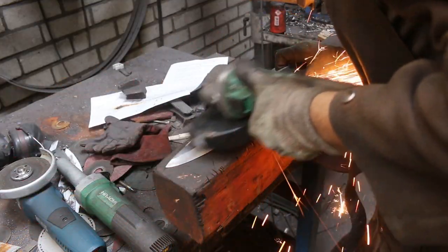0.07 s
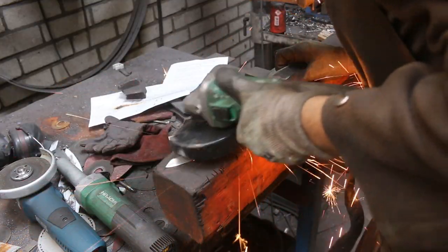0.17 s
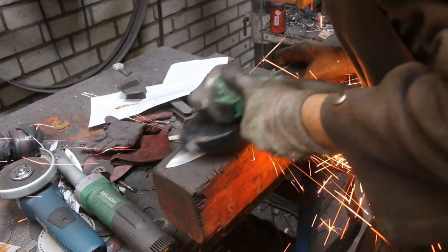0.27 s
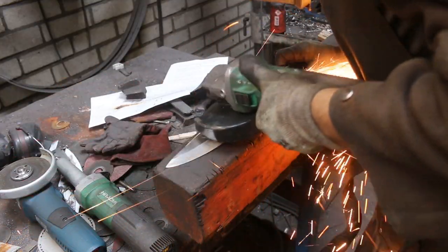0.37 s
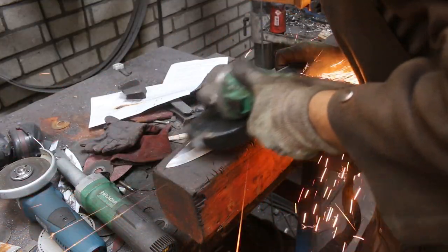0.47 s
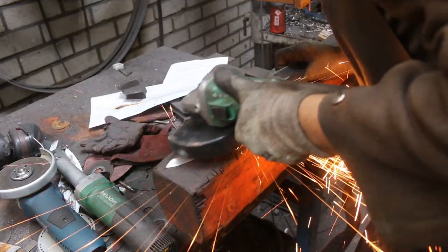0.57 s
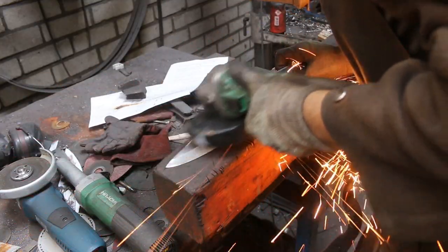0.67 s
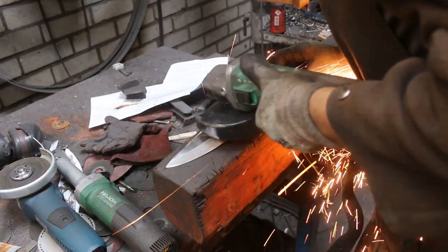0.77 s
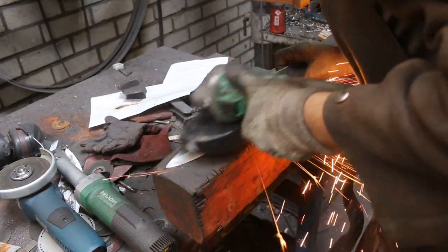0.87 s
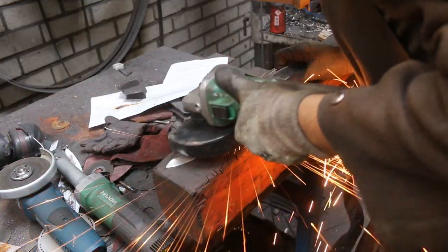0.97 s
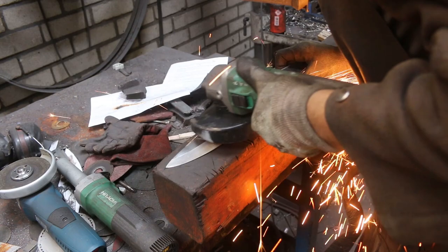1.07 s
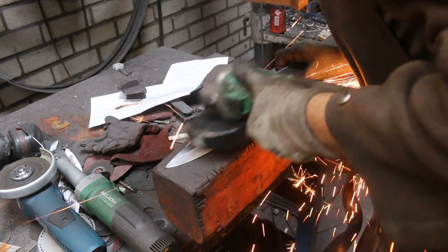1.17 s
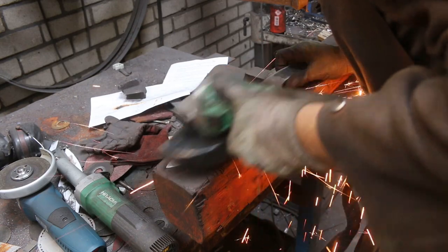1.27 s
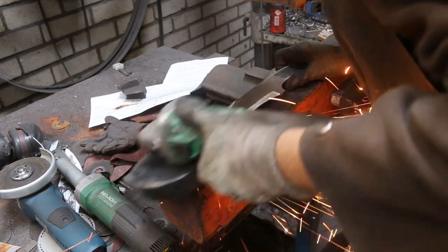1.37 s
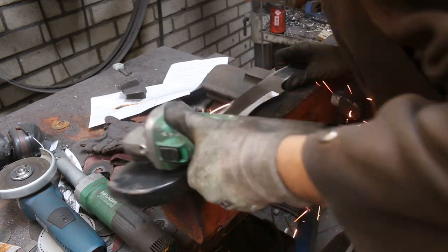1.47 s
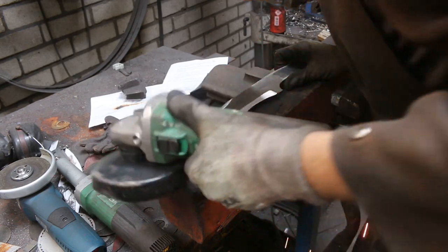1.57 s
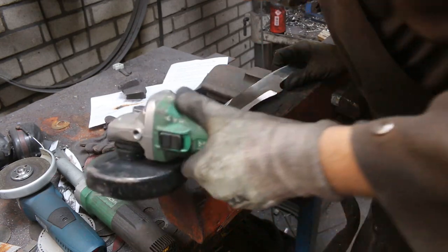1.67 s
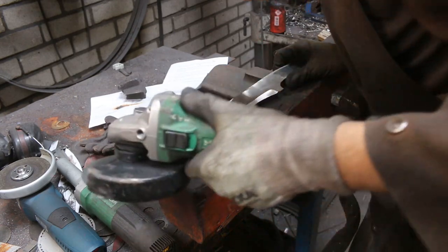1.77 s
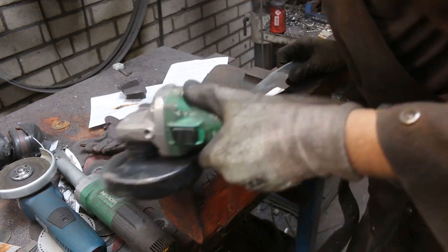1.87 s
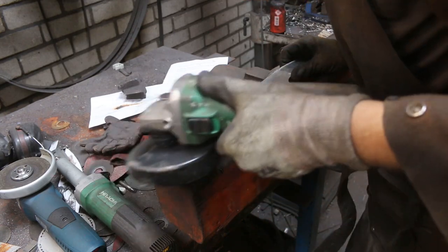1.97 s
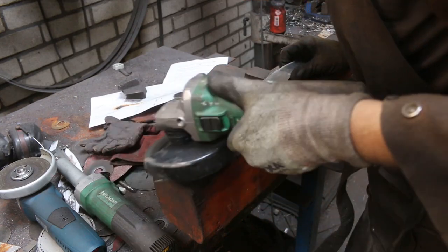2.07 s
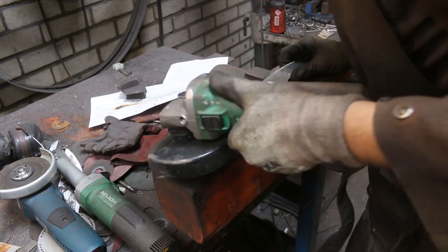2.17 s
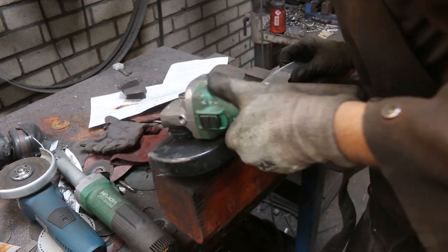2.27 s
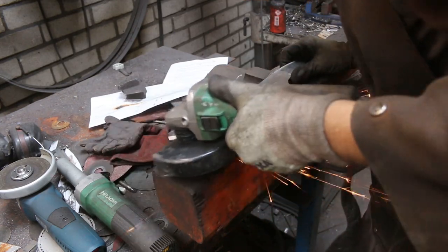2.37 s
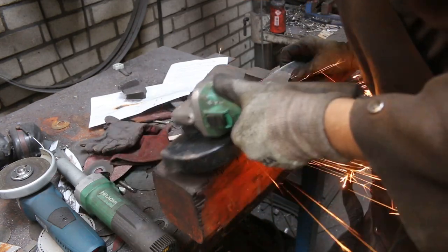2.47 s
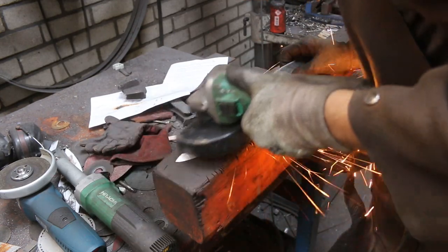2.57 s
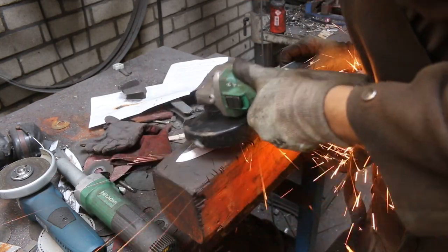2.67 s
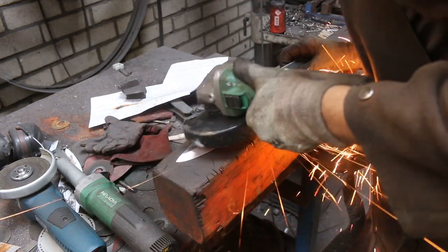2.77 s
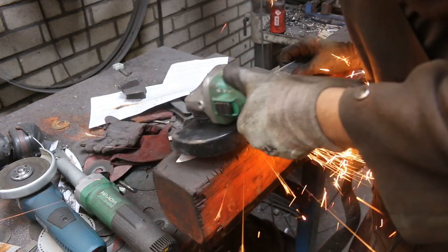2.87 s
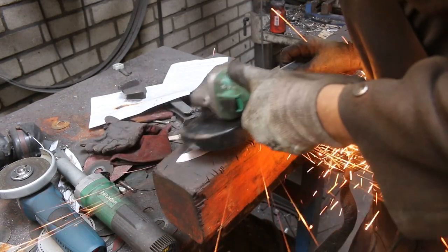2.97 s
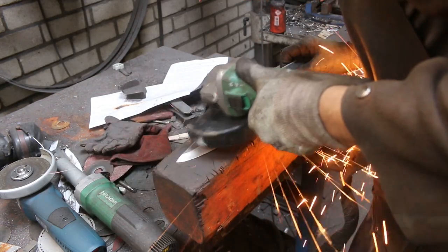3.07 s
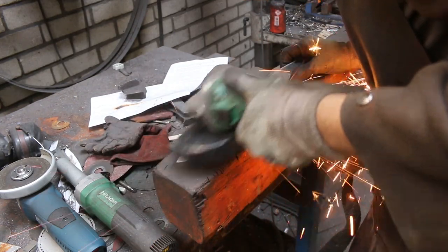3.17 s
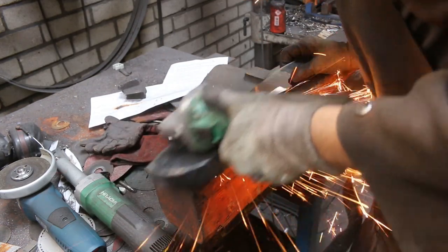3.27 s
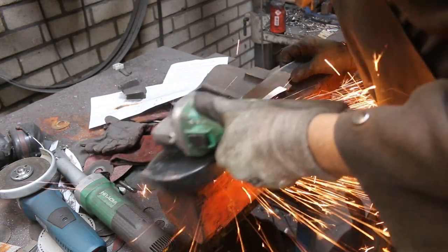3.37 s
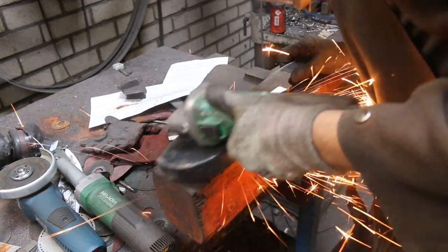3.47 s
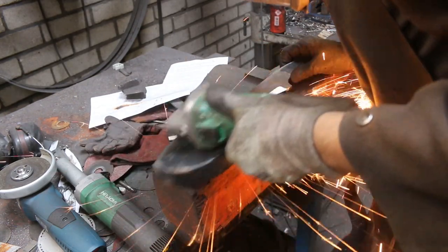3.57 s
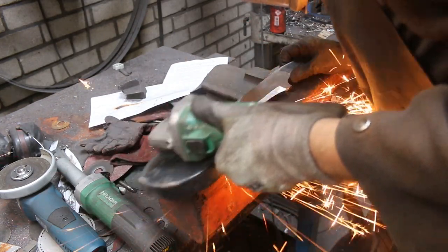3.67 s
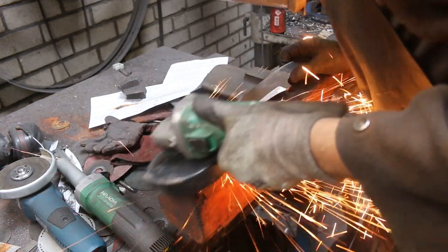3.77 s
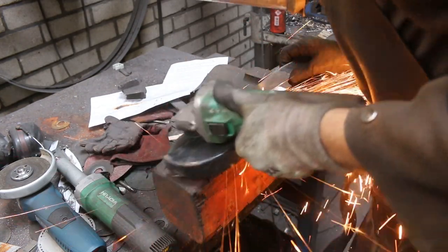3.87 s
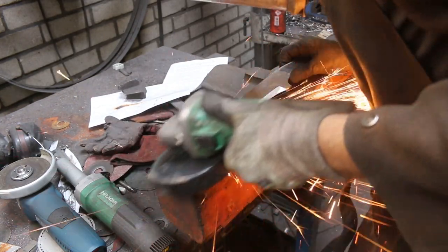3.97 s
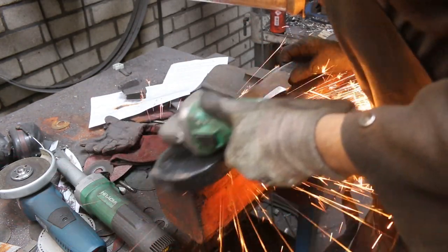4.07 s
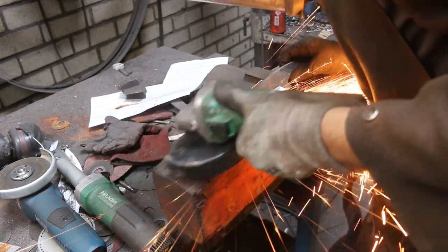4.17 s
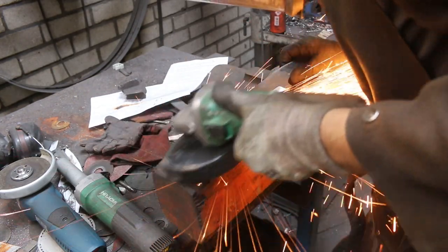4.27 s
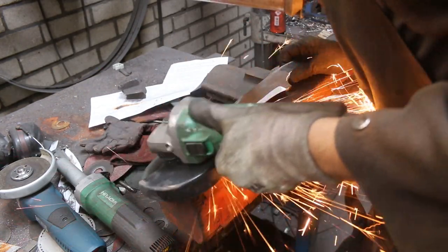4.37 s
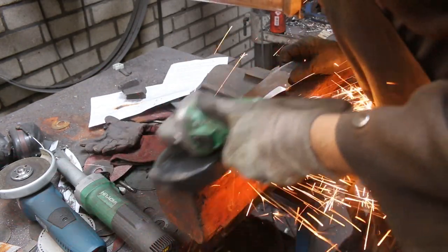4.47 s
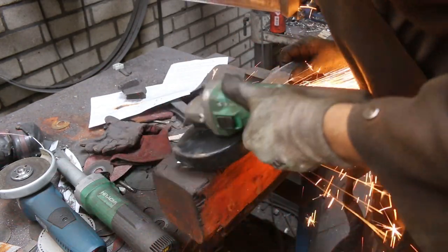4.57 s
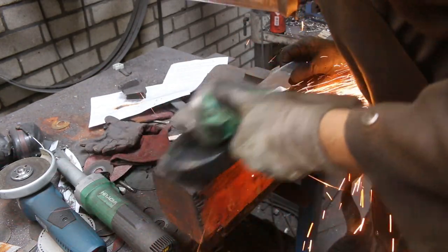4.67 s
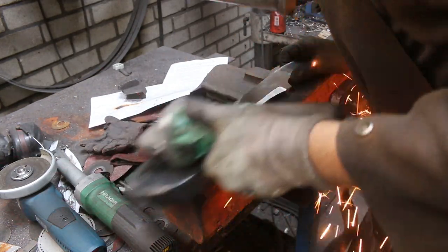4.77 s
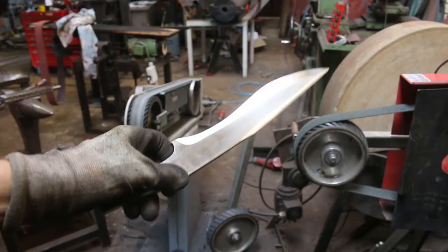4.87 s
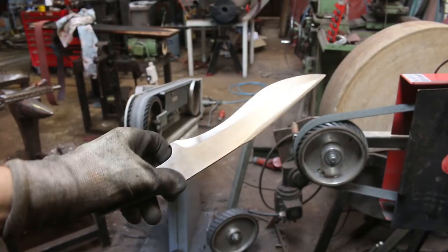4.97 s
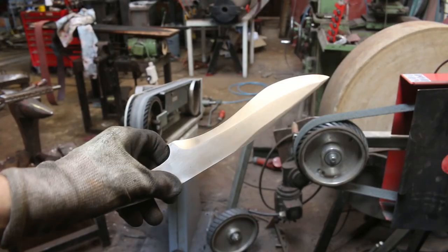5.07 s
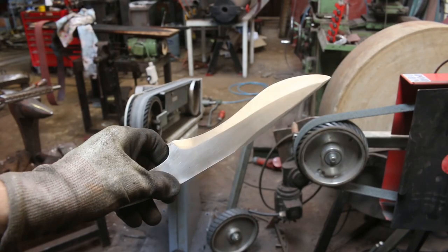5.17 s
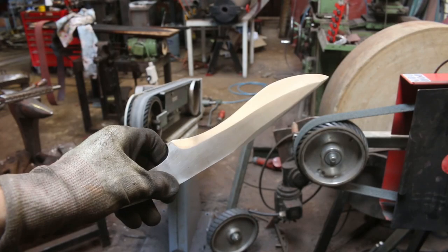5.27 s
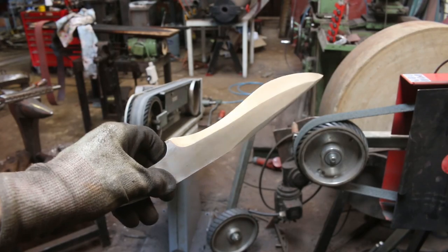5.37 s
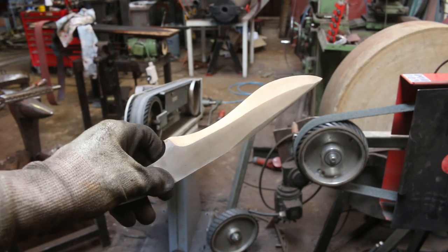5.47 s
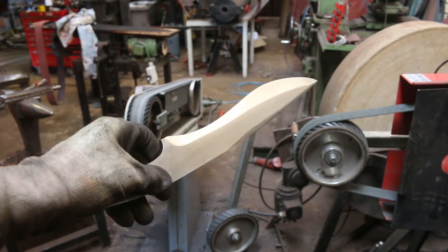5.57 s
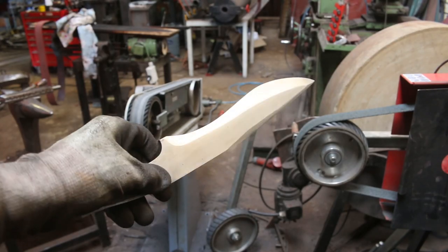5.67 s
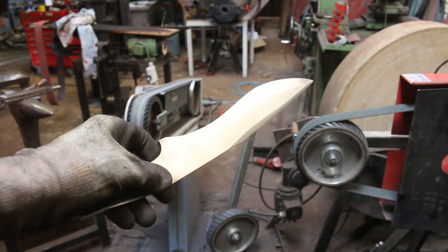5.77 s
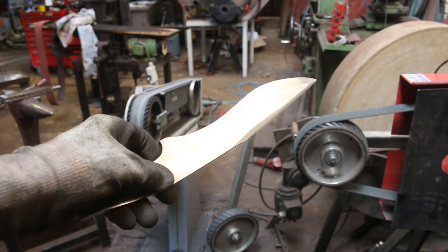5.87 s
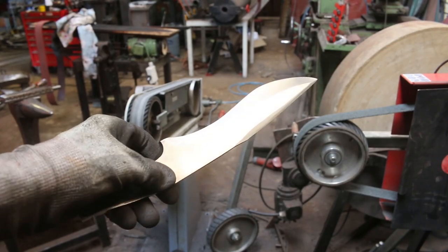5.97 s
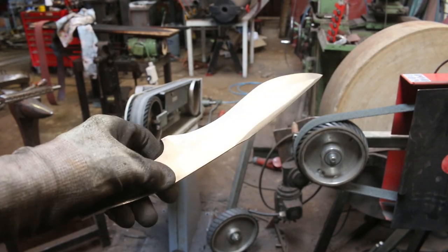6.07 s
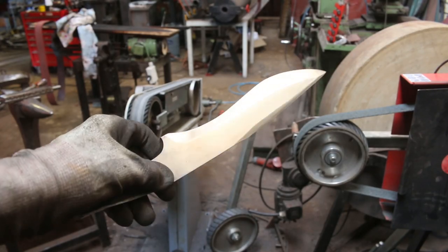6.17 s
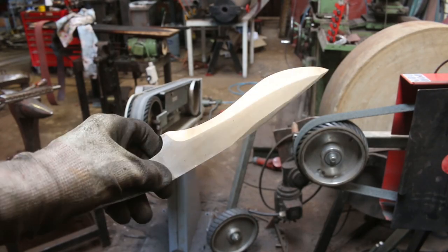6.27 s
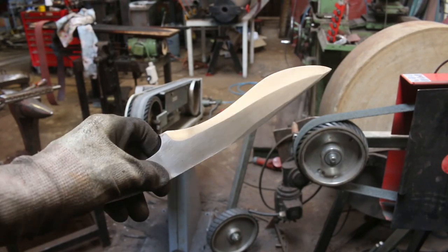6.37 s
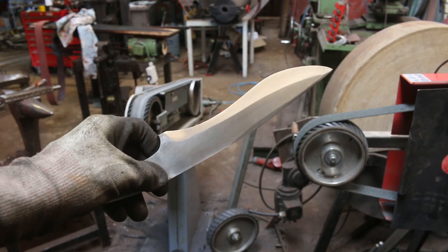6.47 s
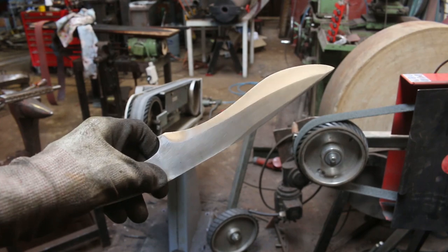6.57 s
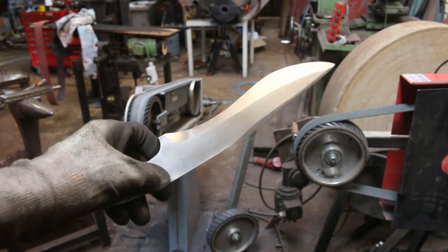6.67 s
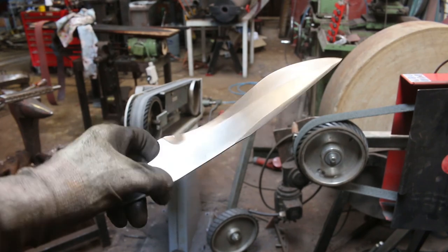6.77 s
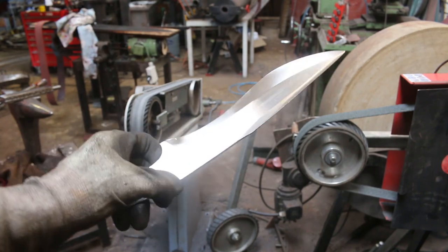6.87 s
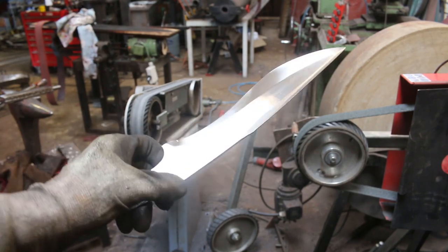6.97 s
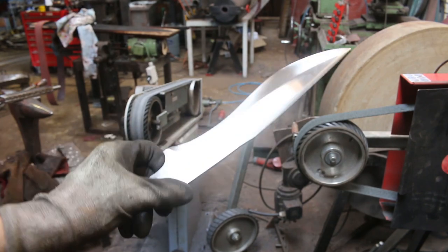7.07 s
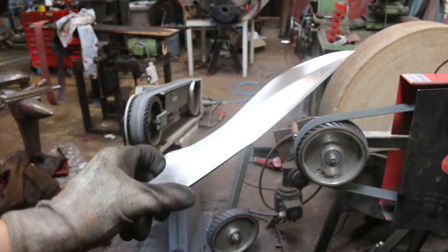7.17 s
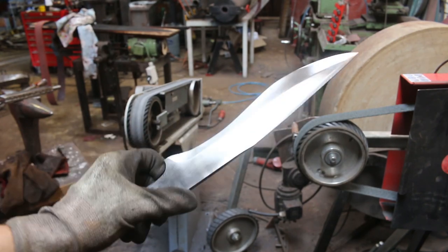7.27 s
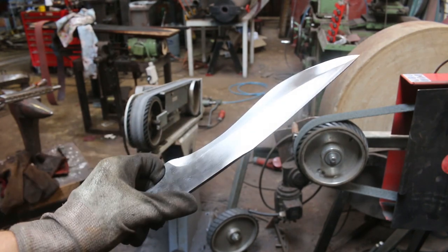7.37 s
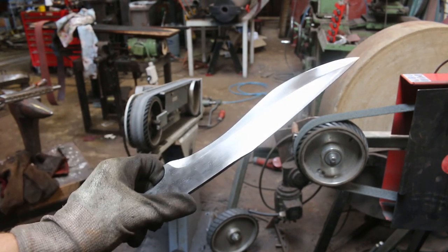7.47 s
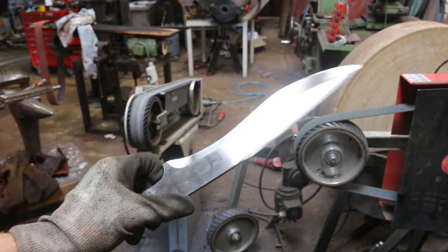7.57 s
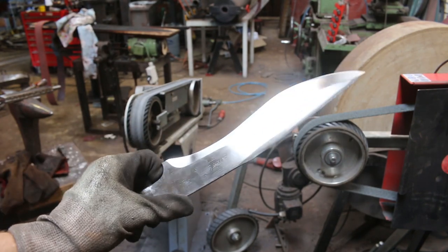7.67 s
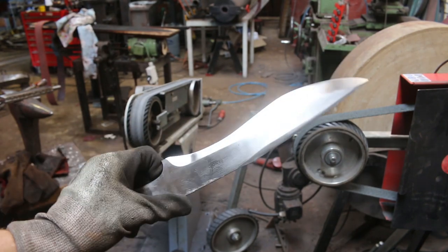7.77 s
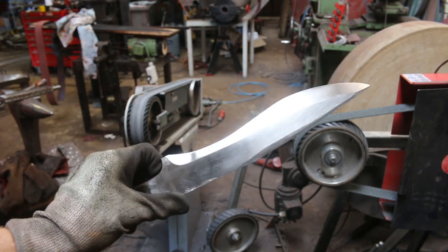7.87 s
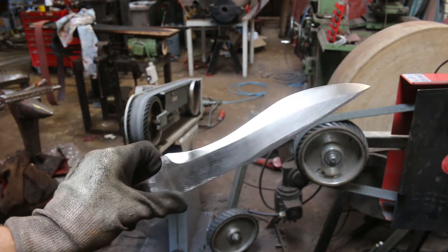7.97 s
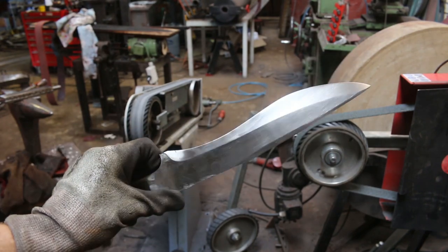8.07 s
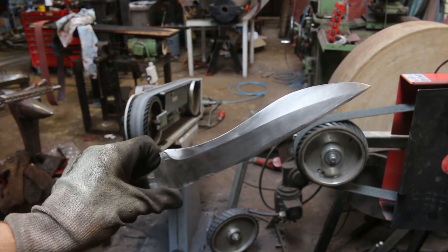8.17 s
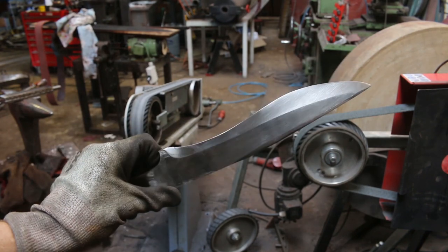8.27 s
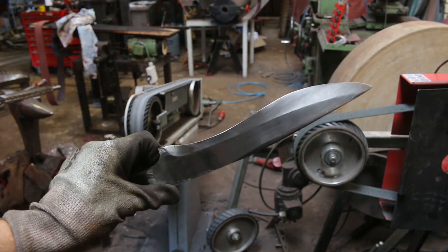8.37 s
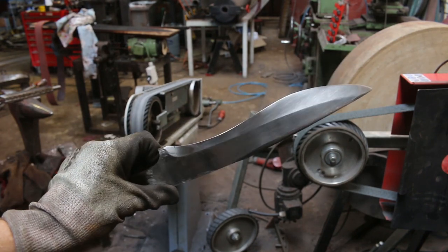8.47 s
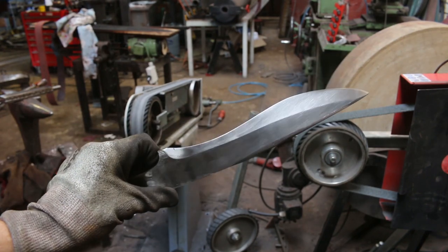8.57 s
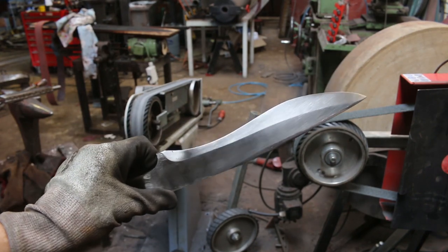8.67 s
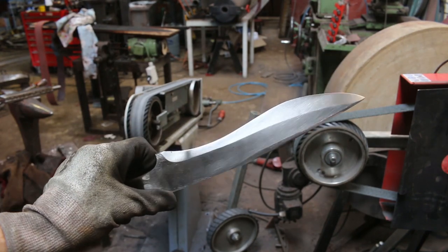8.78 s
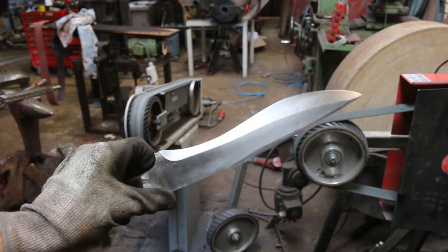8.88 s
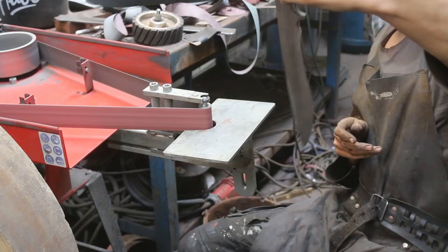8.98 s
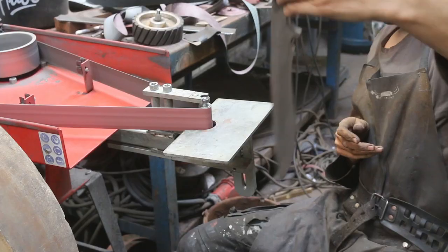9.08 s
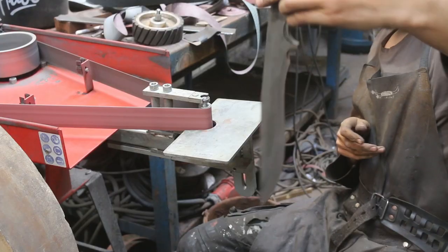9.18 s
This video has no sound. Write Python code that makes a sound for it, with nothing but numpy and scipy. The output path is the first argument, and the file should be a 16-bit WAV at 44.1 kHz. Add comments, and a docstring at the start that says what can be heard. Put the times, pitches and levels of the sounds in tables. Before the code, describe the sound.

A metal workshop, heard close and in stereo. From 0 to about 1.5 s an angle grinder bites into a steel blade: bright gritty hiss and a ringing, chattering scrape, swelling and easing as the hand works to and fro. At 1.5 s it lifts off; the steel ring dies quickly and the disc speeds up, with rattling gears, rising whine and rushing fan air. Around 2.45 s it lands again and labours, its speed sagging until about 4.1 s, with thin high squeals near 3 s and pulsing pushes until 4.75 s. It lifts briefly, clattering. At 4.93 s an abrupt cut: a louder belt grinder runs steadily, with deep room-filling rumble, finely pulsing mid-range belt hiss and a constant whine near 800 Hz. From about 9 s another cut makes the belt harsher and brighter, with rough rasp and several metallic frame tones, to the end.

```python
"""A metal workshop. First an angle grinder bites into a steel blade: worn grit rings disc and blade.
It lifts off and spins up with rattling gears, then bites again and labours before lifting once more;
its grinding, gear noise, whines and fan are built from noise and tones that follow the disc's speed.
Abruptly a belt grinder takes over: noise rumbles in the room's modes, belt hiss pulses, tones whine.
At the very end a belt grinder sounds harsher and brighter, with rasping noise and the tones of its frame."""
import sys
import numpy as np
from scipy import signal
from scipy.fft import rfft, irfft, next_fast_len
from scipy.io import wavfile
from scipy.ndimage import uniform_filter1d, map_coordinates

SR = 44100
rng = np.random.default_rng(int(sys.argv[2]) if len(sys.argv) > 2 else 0)


def generate_wav(sig):
    """Save sig (samples, or channels by samples) to the path in sys.argv[1] as 16-bit PCM at SR."""
    pcm = np.round(np.clip(np.atleast_2d(sig).T, -1, 1) * 32767).astype(np.int16)
    wavfile.write(sys.argv[1], SR, pcm)


N = 406161

# The disc's speed before bites and tremor. Each row: time in seconds, speed in turns a second.
DISC_SPEED = [(0, 114), (.19, 111.3), (.31, 113.8), (1.15, 116.4), (1.38, 116.7), (1.82, 133.8),
              (2.19, 140.4), (2.51, 147.4), (2.85, 135.7), (3.42, 128.4), (3.62, 122.9), (4.05, 115.1),
              (4.37, 112.25), (4.73, 113.8), (4.93, 123)]
# The disc on the steel. Each row: start in seconds, end in seconds, running noise at working speed in dB,
# blade ring in dB, fade of the blade ring in dB a second.
CUTS = [(0.0, 1.469, -47, -35, 3), (2.447, 4.77, -53.5, -37, 3.5)]
# The disc in the air. Each row: start in seconds, end in seconds, running noise and gear clacks
# at working speed in dB.
FREE_SPINS = [(1.48, 2.455, -57.5, -41), (4.76, 5.0, -52.5, -35)]
# The hand works to and fro and the grit bites deeper. Each row: peak time in seconds, spread in seconds,
# depth in dB.
BITE_MOMENTS = [(.08, 0.099, 7.5), (0.532, .24, 4), (0.802, 0.088, 8), (1.269, 0.24, 6.5), (2.5, 0.16, 7.5),
                (2.725, .13, 6), (3.113, 0.062, 4), (3.408, .24, 5.5), (3.751, .14, 5), (4.095, 0.2, 4),
                (4.418, 0.15, 5), (4.73, 0.07, 4.5)]
# The disc slides along the steel and its ring swells. Each row: peak time in seconds, spread in seconds,
# level in dB.
RING_SWELLS = [(.1, 0.18, -35), (0.278, .1, -21.5), (0.63, 0.13, -24), (.83, 0.021, -23),
               (0.994, 0.11, -21.5), (1.355, .12, -20), (2.475, 0.033, -21.5), (2.63, 0.13, -20),
               (3.02, 0.26, -23.5), (3.251, 0.079, -18), (3.553, 0.2, -23), (3.86, .06, -25),
               (4.1, 0.24, -21), (4.43, 0.15, -18.5), (4.761, .03, -22)]
# One mode of the steel sings out. Each row: peak time in seconds, spread in seconds, pitch in Hz, level in dB.
SINGING_MODES = [(.085, 0.055, 1800, -31), (.8, 0.057, 1830, -28.5), (2.495, 0.051, 4080, -32),
                 (2.918, 0.22, 4123, -24.5), (2.95, 0.2, 4620, -29), (3.0, 0.36, 2810, -34),
                 (3.15, .11, 5450, -27), (3.39, 0.047, 2080, -41), (3.75, 0.12, 7100, -26.5),
                 (4.13, 0.099, 6345, -33.5)]

# Resonances of the disc. Each row: centre in Hz, width in Hz, level in dB.
DISC_RESONANCES = [(3853, 420, 4.5), (4133, 380, 6.5), (4520, 430, -6.5), (5210, 510, -4.5)]
# Resonances of the blade, one list for each cut, as the disc touches another spot.
# Each row: centre in Hz, width in Hz, level in dB.
BLADE_RESONANCES = [
    [(1630, 105, 7), (1860, 340, 2.5), (2750, 300, -23), (5220, 420, -3)],
    [(1670, 580, -4.5), (1997, 340, -2.5), (2812, 61, -5.5)],
]
# The guard, rung by the ninth order. Each row: centre in Hz, width in Hz, level in dB.
GUARD_RESONANCE = [(1013, 49, -49)]
# The housing, rung by the third order. Each row: centre in Hz, width in Hz, dB against the running noise.
HOUSING_RESONANCE = [(390, 20.5, 0)]
# Resonances of the fan's rasp. Each row: centre in Hz, width in Hz, level in dB.
FAN_RESONANCES = [(1020, 250, -8), (1961, 630, -2.5), (2860, 1200, -6)]
# Room modes that the belt grinder drives. Each row: centre in Hz, width in Hz, level in dB.
ROOM_MODES = [(118.8, 14, -6), (140, 8, -37), (164.8, 14, -0.5), (194, 26, 0.5), (215, 15.5, -8.5),
              (230.9, 20.4, 1.5), (253.2, 3.7, -1), (290.8, 8.2, -3.5), (336.2, 2.9, -3), (378.7, 46, -7.5),
              (431, 22, -12)]

# Spectrum of the grit's hiss. Each row: frequency in Hz, density in dB.
GRIT_SPECTRUM = [(500, -50), (1250, -16), (1700, -15), (2500, -8.5), (4500, 0.5), (5900, -2.5), (6900, 0.5),
                 (8700, -2.5), (10400, -0.5), (12500, -6), (15800, -8)]
# Spectrum of the gearbox hiss. Each row: frequency in Hz, density in dB.
GEARBOX_SPECTRUM = [(50, -33), (100, -13.5), (160, -1.5), (310, -10), (600, -6), (1000, -9), (1450, -5.5),
                    (1900, -0.5), (3300, 0.5), (5000, -2.5), (8000, -8.5), (9200, -13.5), (15800, -20.5)]
# Spectrum of the gear clacks. Each row: frequency in Hz, density in dB.
CLACK_SPECTRUM = [(1000, -48), (2500, -17), (3800, 1), (5200, 4), (6400, 1.5), (7800, -41), (15000, -44)]
# Spectrum of the shop's background. Each row: frequency in Hz, density in dB.
SHOP_SPECTRUM = [(25, -41), (60, -1), (120, -18), (180, 6), (260, -6), (400, -5), (900, 5), (3000, -15)]
# Spectrum of the belt grinder's shaking. Each row: frequency in Hz, density in dB.
RUMBLE_SPECTRUM = [(20, -44), (45, -50), (60, -19.5), (100, -6.5), (170, 0.5), (300, -4), (400, -2),
                   (480, -9), (700, -14), (1000, -29), (2000, -52.5)]
# Spectrum of the belt's hiss. Each row: frequency in Hz, density in dB.
BELT_SPECTRUM = [(400, -27), (900, -6), (1200, 3.5), (1600, -7), (2100, -5.5), (2700, -9.5), (3300, -19),
                 (4700, -19.5), (5400, -27), (7000, -28.5), (8800, -34.5), (10800, -29), (13000, -42),
                 (15800, -98)]
# Spectrum of the harsh belt's rasp. Each row: frequency in Hz, density in dB.
HARSH_SPECTRUM = [(25, -38), (60, -13.5), (150, -0.5), (260, 6), (350, -3), (500, -5), (900, -3.5),
                  (1150, -0.5), (1500, -5), (2300, -1), (3600, -6.5), (4400, -5.5), (5400, -12),
                  (15800, -26)]

# Weaker shaft tones. Each row: multiple of the disc's speed, level in dB.
SHAFT_ORDERS = [(2, -62.5), (3, -64)]
# The motor's airy whines. Each row: multiple of the disc's speed, relative level in dB.
AIRY_ORDERS = [(45, -2), (71, -10), (95, -12)]
# Steady tones of the belt grinder. Each row: pitch in Hz, level in dB, waver in dB.
BELT_WHINES = [(813, -27, .5), (877.5, -49, 3), (1394, -41, 1), (1497, -35, 1.5), (1626, -41, 1),
               (2089, -50, 3), (2169, -51.5, 3), (2439, -45.5, 2.5), (2514, -55, 3), (2616, -57, 3),
               (3036, -63, 3), (3252, -64, 3), (4350, -67, 3), (4759, -69, 3)]
# Tones of the harsh belt grinder's frame. Each row: pitch in Hz, level in dB.
FRAME_TONES = [(290.7, -28.5), (409.1, -26.5), (689.1, -32.5), (1141, -34.5), (1550, -35), (1890, -39),
               (2213, -33.5), (2514, -35.5), (2794, -46), (2859, -37), (3182, -46), (4210, -40)]

# Left-right likeness of the angle grinder's noises, the shop's background and the harsh belt's rasp.
# Each row: frequency in Hz, coherence from 0 to 1.
DISC_LIKENESS = [(60, 1.0), (180, 1.0), (550, 0.99), (1650, 0.92), (4970, 0.65), (15000, 0.29)]
# Left-right likeness of the first belt grinder's rumble and hiss.
# Each row: frequency in Hz, coherence from 0 to 1.
BELT_LIKENESS = [(400, 1), (900, .99), (2000, .92), (5000, .3), (15000, .3)]

BELT_START_S, HARSH_START_S = 4.933, 9.019
TOP_HZ = 15800
# each bite slows the disc: turns a second lost per dB of bite, and the lag of the disc's inertia
SAG_PER_DB, INERTIA_S = .23, .23
# the unsteady hand makes the speed waver: turns a second, random knots a second
TREMOR, TREMOR_RATE = .15, 11
LANDING_S = 0.0064  # the disc lands on the steel in this time
LEAVING_S = 0.14  # after it leaves, the ringing dies by 60 dB in this time
# grit hiss and disc ring in a light cut; blade ring gained per dB of bite
HISS_DB, RING_DB, BLADE_PER_BITE = -26, -29, 0.3
WORKING_SPEED = 114  # turns a second
# loudness gained per turn a second above the working speed
LOADED_RISE_DB, FREE_RISE_DB, CLACK_RISE_DB = 0.1361, 0.65, 0.3743
# against the running noise: gear hiss, its gain in free spin, the fourth-order whine in the cut
GEARBOX_DB, FREE_DB, WHINE_DB = 15, 3.0, -1
# against the running noise in free spin: the fourth-order whine, airy whines and fan rasp at top speed
WHINE_FREE_DB, AIRY_DB, FAN_DB = -3.5, 10.5, 13.5
HARSH_WAVER_DB = 1.6


def amp(db):
    """Decibels to gain."""
    return 10 ** (np.asarray(db) / 20)


def unit(x):
    """Scale to rms 1."""
    return x / np.sqrt(np.mean(x ** 2) + 1e-20)


def along(points, hz):
    """(Hz, value) points read on a log axis."""
    f, v = np.transpose(points)
    return np.interp(np.log(hz + 1), np.log(f + 1), v)


def clock():
    """The time of every sample in seconds."""
    return np.arange(N) / SR


def between(start, end, fade=.002):
    """A gate that is open from start to end."""
    return np.clip(np.minimum(clock() - start, end - clock()) / fade + .5, 0, 1)


def swell(s, length):
    """A smooth rise and fall of height 1 around s."""
    return np.exp(-2 * ((clock() - s) / length) ** 2)


def wobble(rate):
    """A smooth random curve, rate knots a second."""
    knots = rng.standard_normal(int(N * rate / SR) + 4)
    return map_coordinates(knots, [clock() * rate])


def noise():
    """Two unrelated white noises."""
    return rng.standard_normal((2, N))


def filtered(x, response):
    """x shaped by a response of frequency."""
    size = next_fast_len(N + 8192)
    spectrum = rfft(x, size) * response(np.fft.rfftfreq(size, 1 / SR))
    return irfft(spectrum, size)[..., :N]


def colour(points):
    """The response of a (Hz, dB) spectrum."""
    return lambda hz: amp(along(points, hz))


def resonances(modes):
    """The response of steep-sided (Hz, width, dB) peaks, added in power."""
    def response(hz):
        peaks = [amp(db) / (1 + ((hz - f) / width * 2) ** 2) for f, width, db in modes]
        return np.sqrt(sum(peak ** 2 for peak in peaks))
    return response


def stereo(pair, response, alike):
    """Two unrelated signals, coloured and blended into left and right of rms 1."""
    def blend(hz):
        turn = np.arccos(np.clip(along(alike, hz), -1, 1)) / 2
        return response(hz) * np.array([np.cos(turn), np.sin(turn)])
    mid, side = filtered(pair, blend)
    return unit(np.array([mid + side, mid - side]))


def lean_left(x, db):
    """Raise the left and lower the right by db."""
    return x * amp([[db], [-db]])


def lagging(x, keep, axis=-1):
    """A one-pole smoother that holds on to the share keep of its past."""
    return signal.lfilter([1 - keep], [1, -keep], x, axis=axis)


def steady(x):
    """The hand's pressure, not the rim's wear, sets how hard a mode rings: hold its strength at rms 1."""
    power = uniform_filter1d(np.mean(x ** 2, axis=0), SR // 25)
    return x / np.sqrt(np.abs(power) + 1e-9)


def bursts(rate, scatter, size_db, t60):
    """An envelope of sharp knocks that die away, at uneven gaps and of uneven size."""
    chance = rng.standard_normal((6000, 2))
    times = np.cumsum(np.exp(scatter * chance[:, 0])) / rate
    heard = times < N / SR
    sizes = amp(size_db * np.tanh(chance[heard, 1]))
    blows = np.bincount((times[heard] * SR).astype(int), sizes, N)
    decay = amp(-60 * clock()[:2048] / t60)
    return unit(signal.fftconvolve(blows, decay)[:N])


def disc_speed(bite_db):
    """Turns a second: each bite drags the disc down, and the motor pulls it back."""
    base = np.interp(clock(), *np.transpose(DISC_SPEED))
    sag = SAG_PER_DB * lagging(bite_db, np.exp(-1 / (INERTIA_S * SR)))
    return base + TREMOR * wobble(TREMOR_RATE) - sag


def contact(start, end):
    """The disc lands on the steel quickly and rings out when it leaves."""
    ring_out = amp(-60 * np.clip(clock() - end, 0, None) / LEAVING_S)
    return between(start, np.inf, fade=LANDING_S) * ring_out


def rim(turns, memory, count=300):
    """The grit profile round the disc: it comes back every turn and wears into a new one over some turns."""
    profile = rng.standard_normal((1300, count))  # turns by points round the rim
    keep = np.exp(-1 / max(memory, 1))
    for _ in range(2):
        profile = lagging(profile, keep, axis=0)
    worn_in = 100  # turns skipped while the smoothing settles
    return unit(map_coordinates(profile.ravel(), [(turns + worn_in) * count], mode="wrap"))


def rim_chatter(turns):
    """The worn rim scrapes the steel, pressing harder at some points of each turn as it runs out of true."""
    profile = np.array([rim(turns, memory=3.5), rim(turns, memory=7.8)])
    once = .62 * np.cos(2 * np.pi * turns)
    twice = .7 * np.cos(4 * np.pi * turns + wobble(3))
    return amp(once + twice) * (profile + .36 * noise())


def disc_ring(chatter):
    """The chatter rings the disc's own modes, which swell as the disc slides."""
    ring = steady(stereo(chatter, resonances(DISC_RESONANCES), DISC_LIKENESS))
    swells = sum((amp(db) * swell(s, length)) ** 2 for s, length, db in RING_SWELLS)
    return ring * np.sqrt(amp(RING_DB) ** 2 + swells)


def patchy(x, depth_db):
    """As the contact point wanders, patches of the spectrum swell and fade."""
    z = signal.stft(x, nperseg=512)[2]
    field = rng.standard_normal(z.shape[1:])
    for _ in range(2):
        field = uniform_filter1d(field, size=6, axis=0)  # across frequency
        field = uniform_filter1d(field, size=18, axis=1)  # across time
    shaped = signal.istft(z * amp(depth_db * unit(field)), nperseg=512)[1]
    return unit(shaped[:, :N])


def grit_hiss(chatter, bite_db):
    """Scraping grit hisses; breaking grains add crackle that never repeats."""
    crackle = bursts(rate=330, scatter=.7, size_db=6, t60=.011) * noise()
    hiss = stereo(chatter + .62 * crackle, colour(GRIT_SPECTRUM), DISC_LIKENESS)
    return amp(HISS_DB + bite_db) * patchy(hiss, depth_db=1.3)


def squeals(chatter, width_hz):
    """Single modes swell out of the chatter and fade again."""
    out = np.zeros((2, N))
    for s, length, hz, db in SINGING_MODES:
        mode = stereo(chatter, resonances([(hz, width_hz, 0)]), DISC_LIKENESS)
        out += amp(db) * swell(s, length) * steady(mode)
    return out


def grinding(turns, bite_db):
    """One chatter of the rim drives disc ring, grit hiss, squeals and the blade's modes in each cut."""
    chatter = rim_chatter(turns)
    disc = disc_ring(chatter) + grit_hiss(chatter, bite_db) + squeals(chatter, width_hz=78)
    out = np.zeros((2, N))
    for (start, end, _, blade_db, fade_db), modes in zip(CUTS, BLADE_RESONANCES):
        fade = fade_db * np.clip(clock() - start, 0, None)
        level_db = blade_db + BLADE_PER_BITE * bite_db - fade
        blade = amp(level_db) * stereo(chatter, resonances(modes), DISC_LIKENESS)
        out += contact(start, end) * (disc + blade)
    return out


def shaft(turns, order):
    """A tone of rms 1 at a multiple of the disc's speed."""
    return np.sqrt(2) * np.sin(2 * np.pi * order * turns)


def gearbox_hiss(loaded, free):
    """The gears' noise flutters finely and is stronger against the running noise in free spin."""
    hiss = stereo(noise() * amp(0.35 * wobble(300)), colour(GEARBOX_SPECTRUM), DISC_LIKENESS)
    return amp(GEARBOX_DB) * (loaded + amp(FREE_DB) * free) * hiss


def shaft_tones(turns, speed, loaded, free):
    """The fourth order whines, the ninth rings the guard, the third hums in the housing in free spin."""
    whine_level = amp(WHINE_DB) * loaded + amp(WHINE_FREE_DB) * free
    whine = whine_level * amp(2.9 * wobble(12)) * shaft(turns, 4)
    guard = resonances(GUARD_RESONANCE)(9 * speed) * amp(3 * wobble(9)) * shaft(turns, 9)
    housing = free * resonances(HOUSING_RESONANCE)(3 * speed) * shaft(turns, 3)
    weak = sum(amp(db + 3.1 * wobble(13)) * shaft(turns, order) for order, db in SHAFT_ORDERS)
    return whine + guard + housing + weak


def shop_background():
    """A low, gently wavering noise of the shop."""
    level = amp(-50.5 + 0.8 * wobble(7.16))
    return level * stereo(noise(), colour(SHOP_SPECTRUM), DISC_LIKENESS)


def motor_air(turns, speed):
    """Air torn by motor and fan gives fuzzy lines and a rasp that grow steeply with speed."""
    share = speed / speed.max()
    lines = sum(amp(db) * wobble(700) * shaft(turns, order) for order, db in AIRY_ORDERS)
    fan = stereo(noise() * amp(1.8 * wobble(400)), resonances(FAN_RESONANCES), DISC_LIKENESS)
    return amp(AIRY_DB) * lines * share ** 12 + amp(FAN_DB) * fan * share ** 5


def gear_clacks():
    """With no load the bevel gears knock about in their backlash."""
    knocks = bursts(rate=50, scatter=.25, size_db=1, t60=.018)
    return stereo(noise() * knocks, colour(CLACK_SPECTRUM), DISC_LIKENESS)


def angle_grinder():
    """Grinding, gear and fan noise, and shaft tones all follow the disc's speed."""
    bite_db = sum(db * swell(s, length) for s, length, db in BITE_MOMENTS)
    speed = disc_speed(bite_db)
    turns = np.cumsum(speed) / SR
    faster = speed - WORKING_SPEED
    # levels of the running noise in the cut and in the air, and of the clacks
    loaded = sum(contact(start, end) * amp(db + LOADED_RISE_DB * faster) for start, end, db, *_ in CUTS)
    free = sum(between(start, end, fade=0.074) * amp(db + FREE_RISE_DB * faster)
               for start, end, db, _ in FREE_SPINS)
    rattle = sum(between(start, end, fade=.04) * amp(db + CLACK_RISE_DB * faster)
                 for start, end, _, db in FREE_SPINS)
    out = grinding(turns, bite_db) + gearbox_hiss(loaded, free)
    out += shaft_tones(turns, speed, loaded, free) + shop_background()
    out += free * motor_air(turns, speed) + rattle * gear_clacks()
    return lean_left(out, .5)


def belt_rumble():
    """Wheels and frame shake and drive the room's modes."""
    shake = stereo(noise(), colour(RUMBLE_SPECTRUM), BELT_LIKENESS)
    boom = stereo(noise(), resonances(ROOM_MODES), BELT_LIKENESS) * amp(0.56 * wobble(10))
    return amp(-23.5) * shake + amp(-19.0) * boom


def belt_hiss():
    """The belt hisses in pulses as the wheels turn, with a faster flutter on top."""
    wheel_hz, flutter_hz = 25.8, 129
    wheel = 0.16 * np.cos(2 * np.pi * wheel_hz * clock() + wobble(5))
    flutter = 0.49 * np.cos(2 * np.pi * flutter_hz * clock() + wobble(4.3))
    hiss = stereo(noise() * amp(wheel + flutter), colour(BELT_SPECTRUM), BELT_LIKENESS)
    return amp(-28.5) * lean_left(hiss, .4)


def machine_tones(lines, drift):
    """Motor, bearing and frame tones; the more one wavers in level, the more it wanders in phase."""
    out = np.zeros(N)
    for hz, db, waver in lines:
        phase = 2 * np.pi * hz * clock() + drift * waver * wobble(12)
        out += np.sqrt(2) * amp(db + waver * wobble(14)) * np.sin(phase)
    return out


def belt_grinder():
    """Rumble and belt hiss reach the left ear first; a steady whine of many tones lies over them."""
    lead = .00009  # seconds by which the left ear hears it first
    ears = np.array([[1], [-1]])
    body = filtered(belt_rumble() + belt_hiss(), lambda hz: np.exp(1j * np.pi * hz * lead * ears))
    return lean_left(body, .1) + lean_left(machine_tones(BELT_WHINES, drift=0.26), .4)


def harsh_belt():
    """Close to the running belt, its rasp and the frame's tones stand out."""
    rasp = stereo(noise() * amp(0.85 * wobble(200)), colour(HARSH_SPECTRUM), DISC_LIKENESS)
    tones = machine_tones([(hz, db, HARSH_WAVER_DB) for hz, db in FRAME_TONES], drift=.2)
    return lean_left(amp(-21.0) * rasp + tones, .4)


def scene():
    """The three stages of the work follow one another without a pause."""
    out = between(-1, BELT_START_S) * angle_grinder()
    out += between(BELT_START_S, HARSH_START_S) * belt_grinder()
    out += between(HARSH_START_S, 10) * harsh_belt()
    return out


def record(dry):
    """Nothing is kept above the band limit."""
    return filtered(dry, lambda hz: hz < TOP_HZ)


dry = scene()
out = record(dry)
generate_wav(out)
```